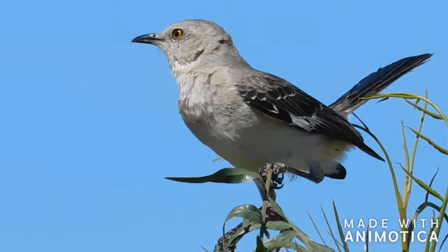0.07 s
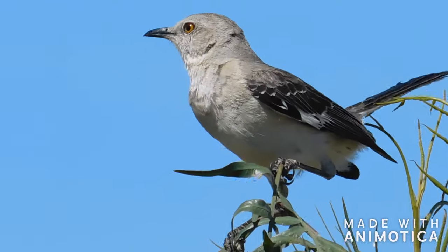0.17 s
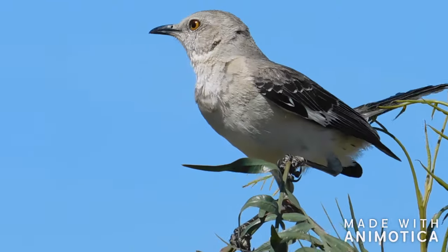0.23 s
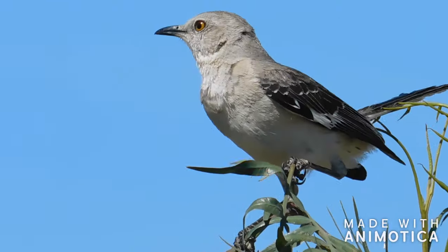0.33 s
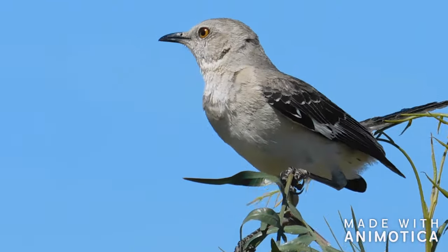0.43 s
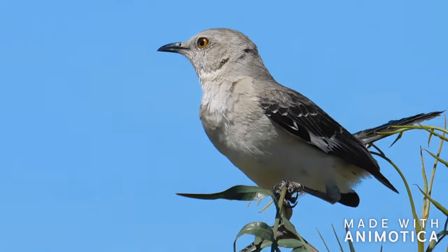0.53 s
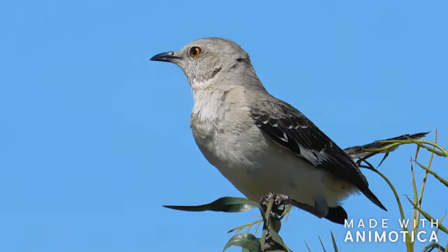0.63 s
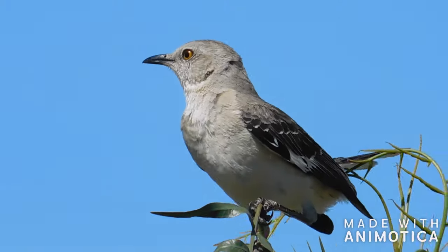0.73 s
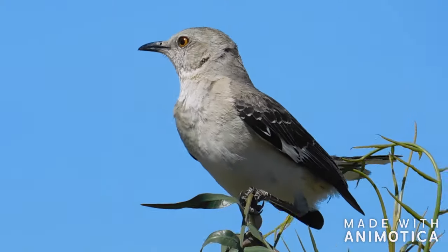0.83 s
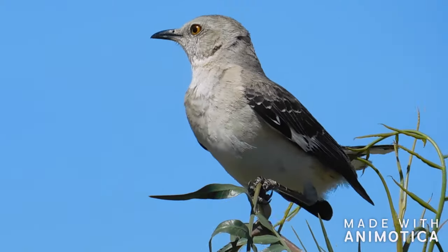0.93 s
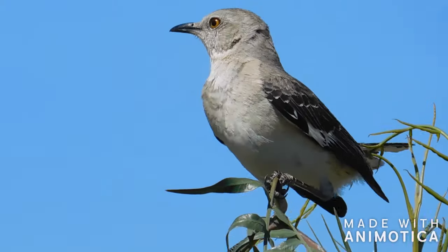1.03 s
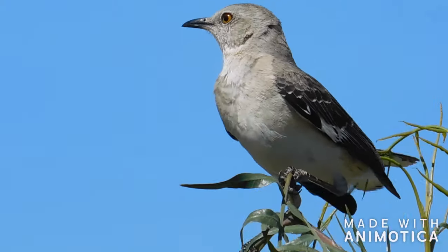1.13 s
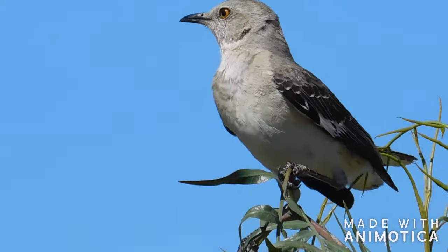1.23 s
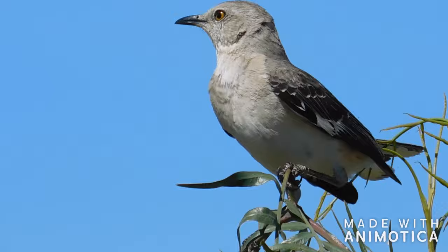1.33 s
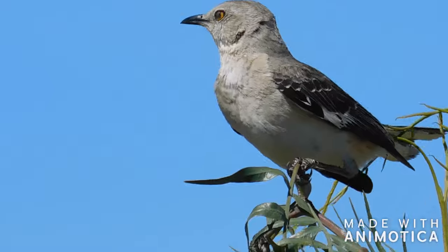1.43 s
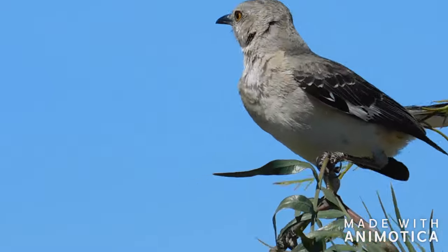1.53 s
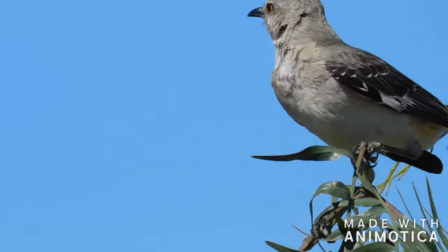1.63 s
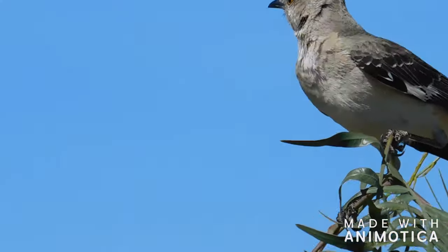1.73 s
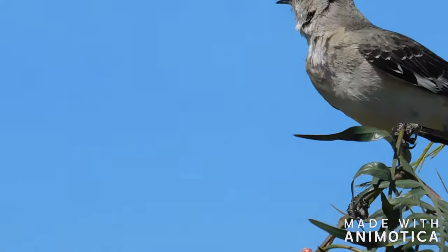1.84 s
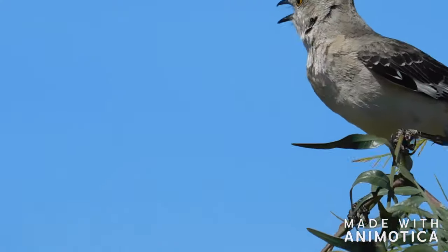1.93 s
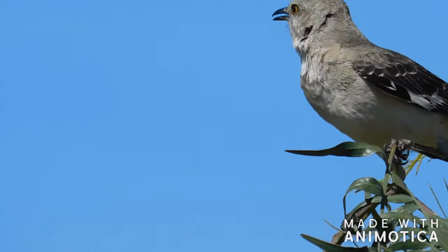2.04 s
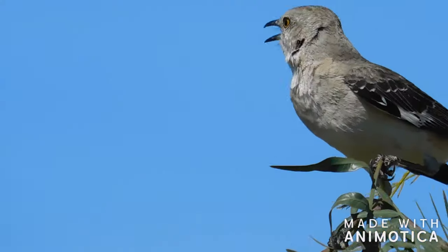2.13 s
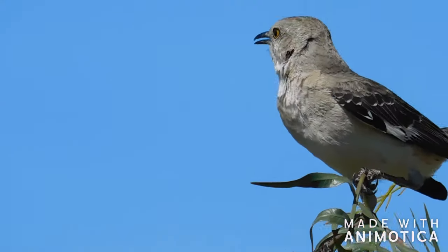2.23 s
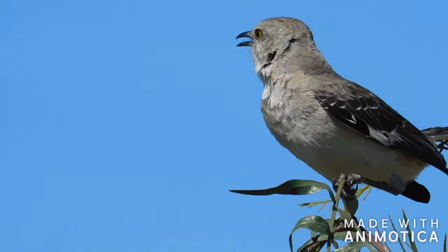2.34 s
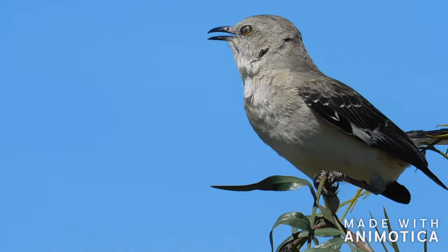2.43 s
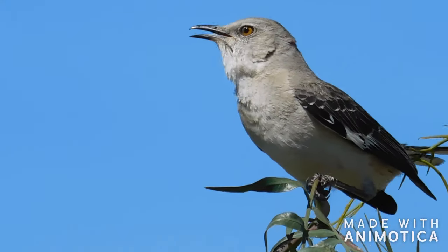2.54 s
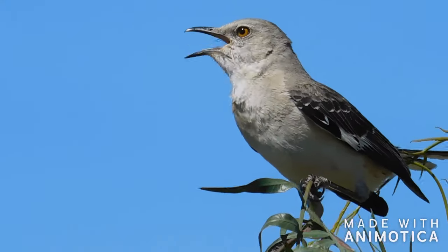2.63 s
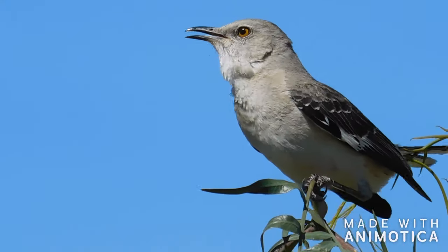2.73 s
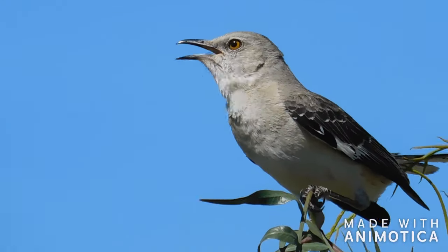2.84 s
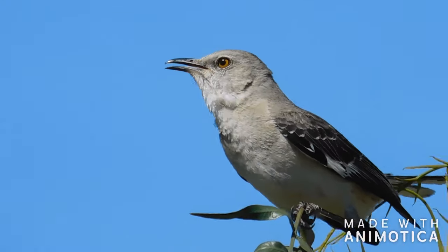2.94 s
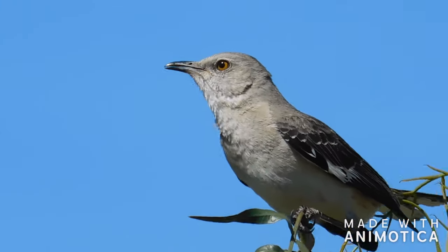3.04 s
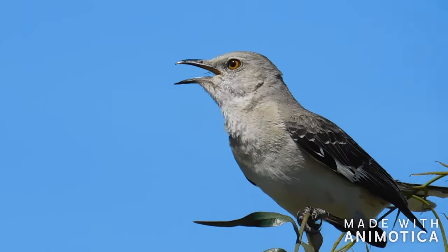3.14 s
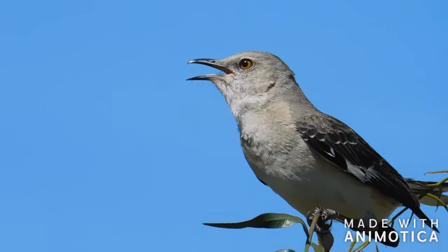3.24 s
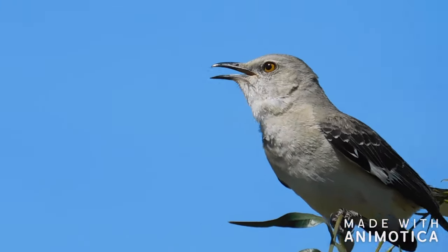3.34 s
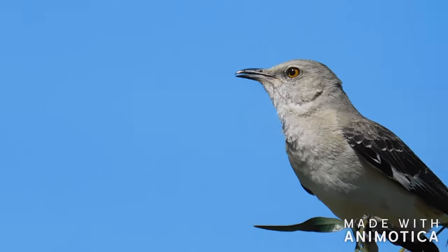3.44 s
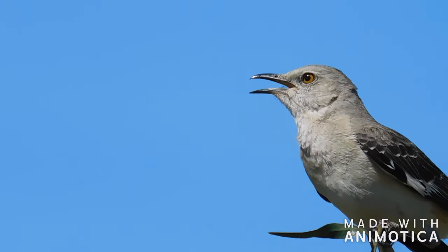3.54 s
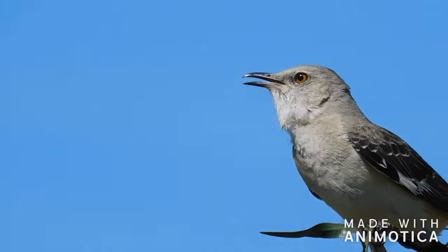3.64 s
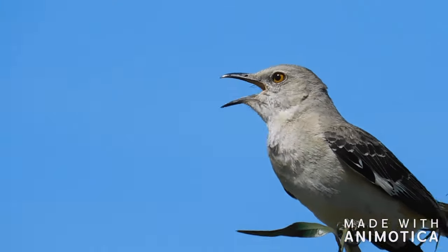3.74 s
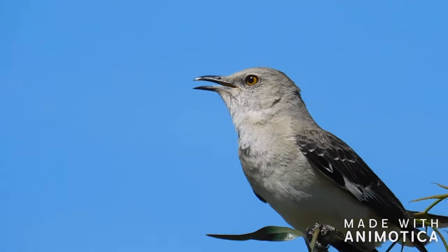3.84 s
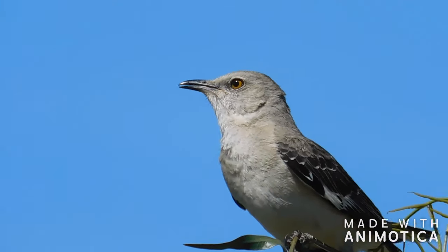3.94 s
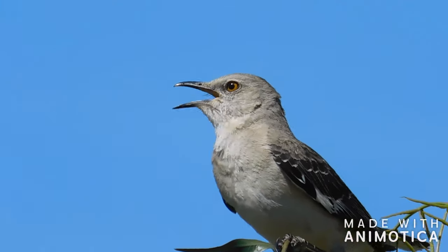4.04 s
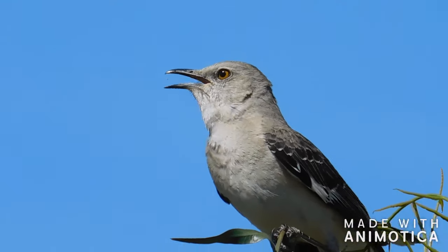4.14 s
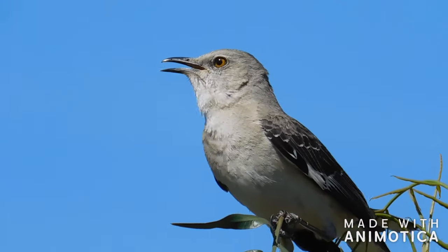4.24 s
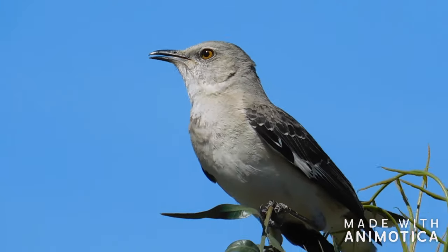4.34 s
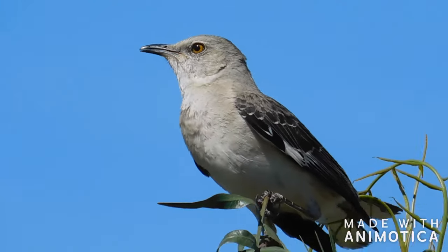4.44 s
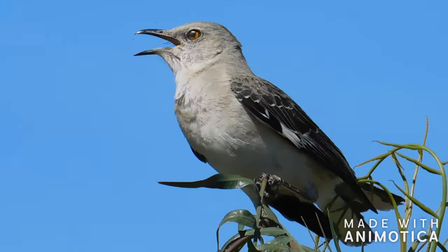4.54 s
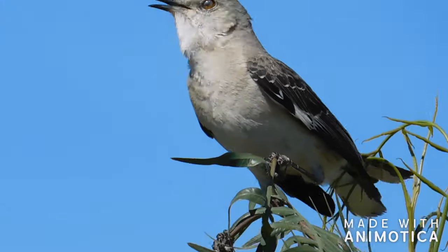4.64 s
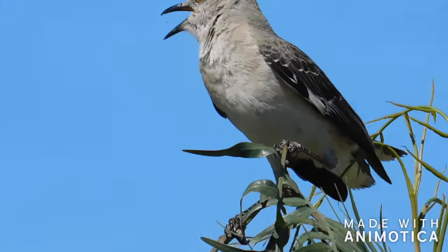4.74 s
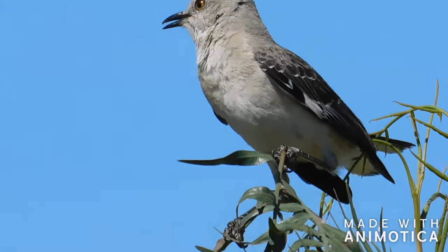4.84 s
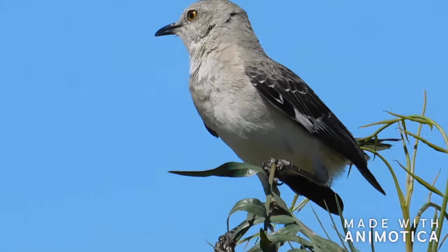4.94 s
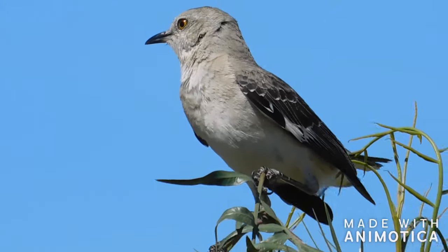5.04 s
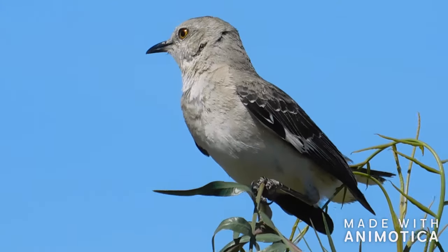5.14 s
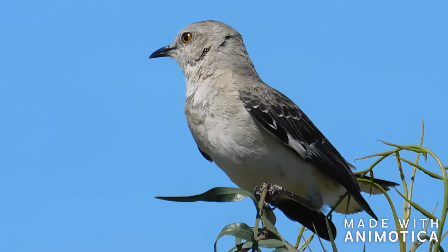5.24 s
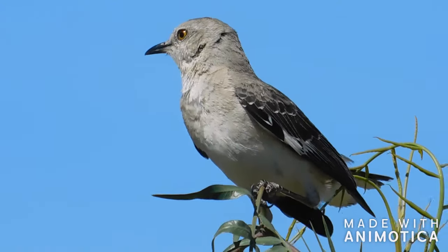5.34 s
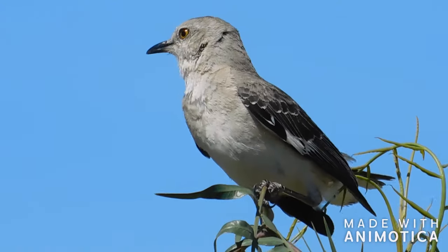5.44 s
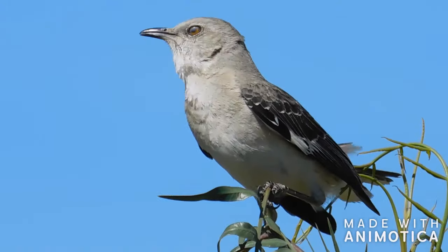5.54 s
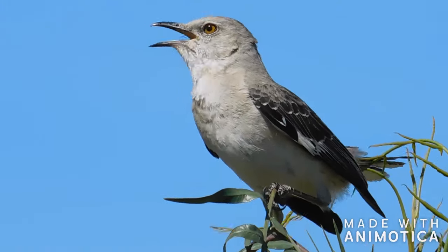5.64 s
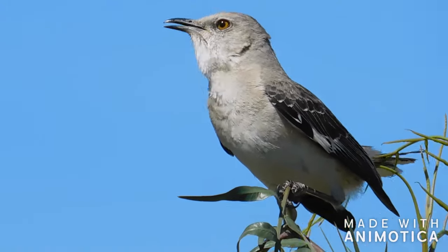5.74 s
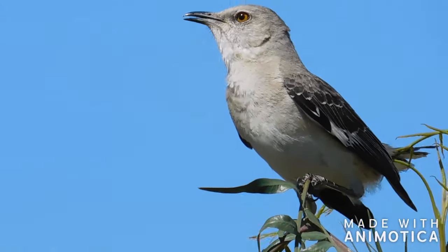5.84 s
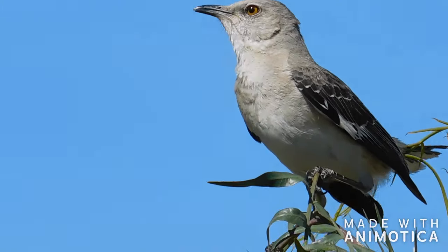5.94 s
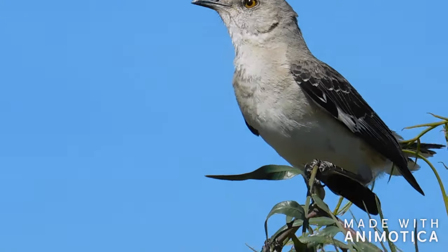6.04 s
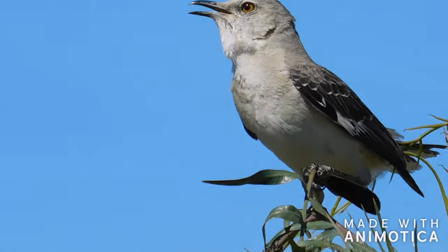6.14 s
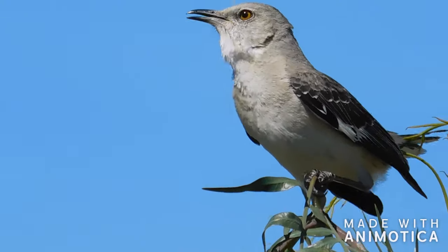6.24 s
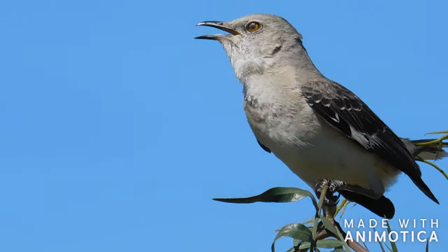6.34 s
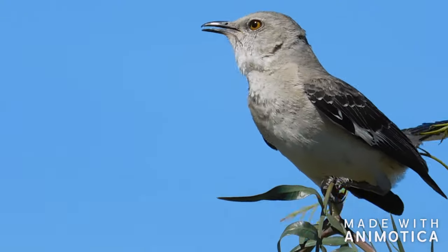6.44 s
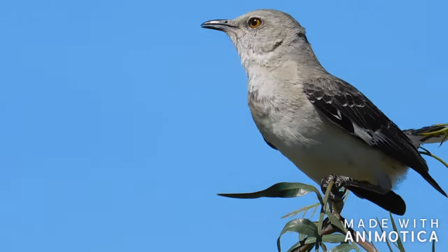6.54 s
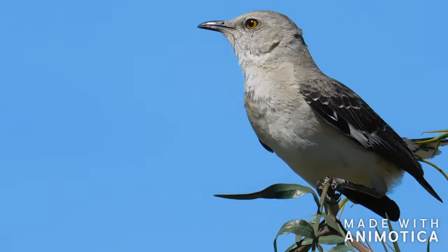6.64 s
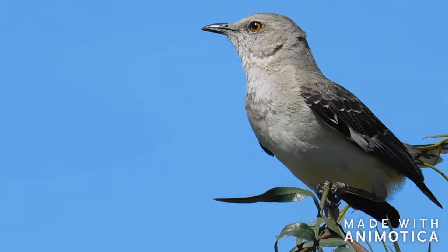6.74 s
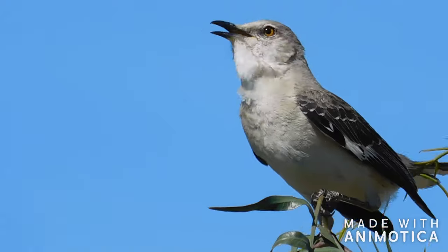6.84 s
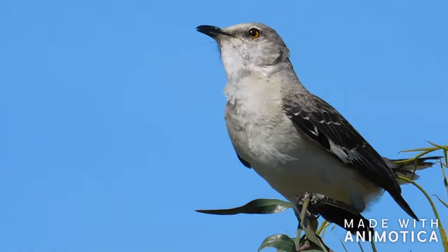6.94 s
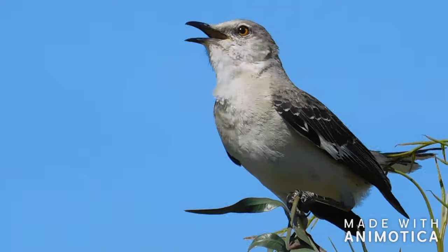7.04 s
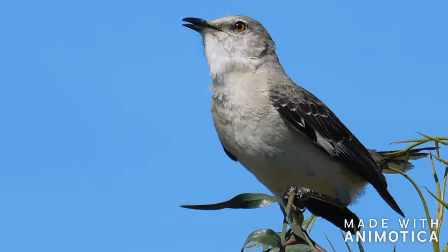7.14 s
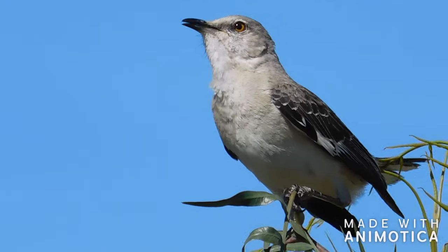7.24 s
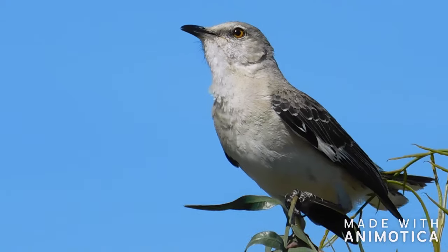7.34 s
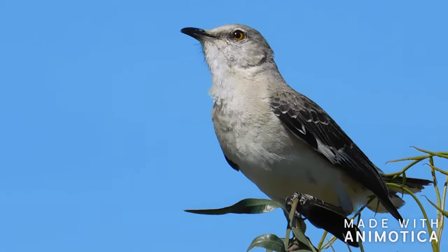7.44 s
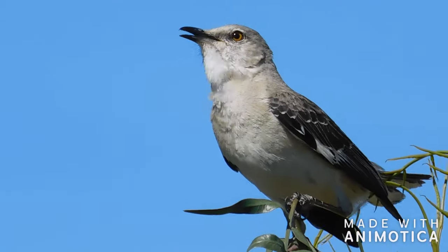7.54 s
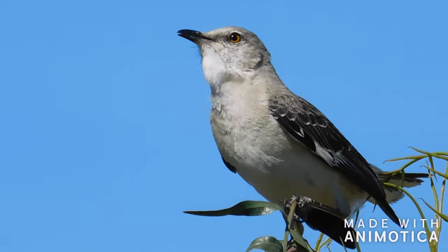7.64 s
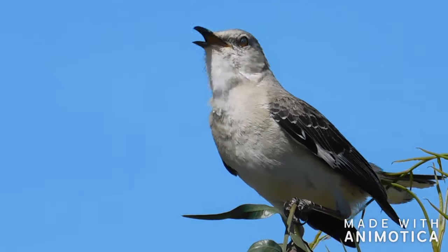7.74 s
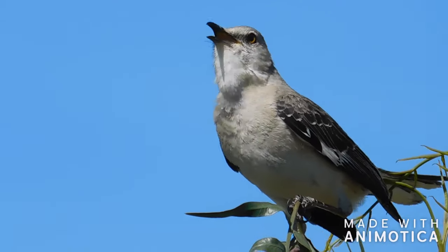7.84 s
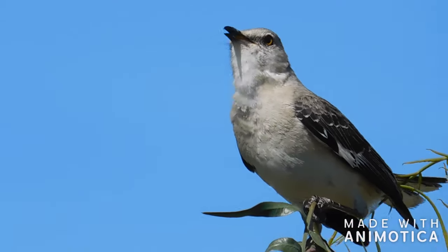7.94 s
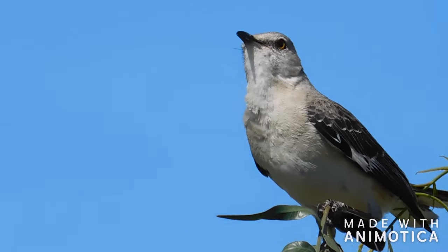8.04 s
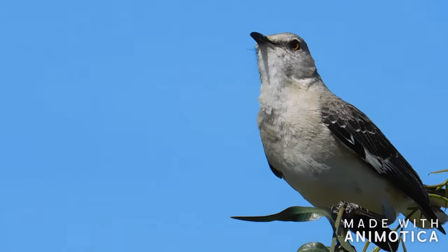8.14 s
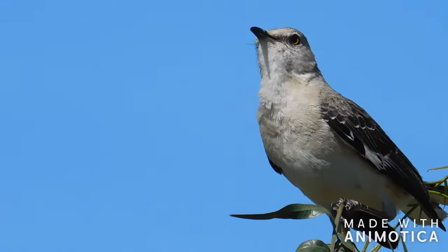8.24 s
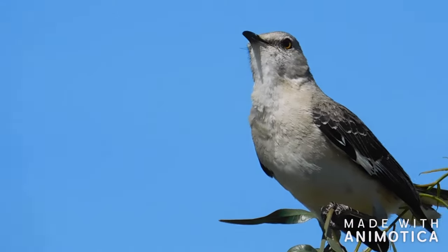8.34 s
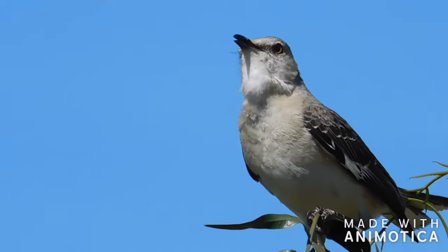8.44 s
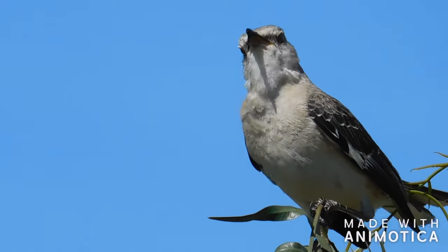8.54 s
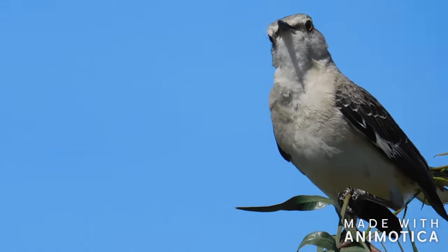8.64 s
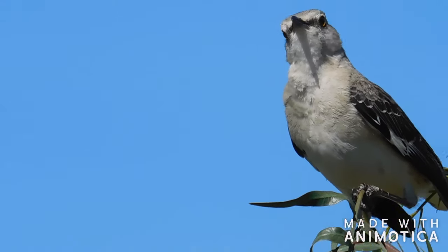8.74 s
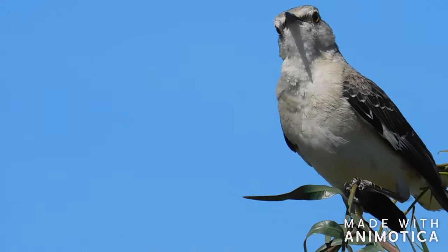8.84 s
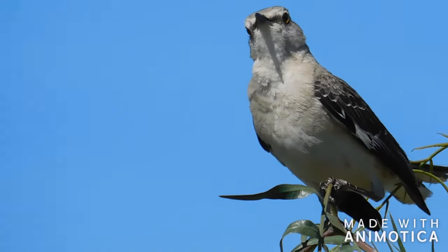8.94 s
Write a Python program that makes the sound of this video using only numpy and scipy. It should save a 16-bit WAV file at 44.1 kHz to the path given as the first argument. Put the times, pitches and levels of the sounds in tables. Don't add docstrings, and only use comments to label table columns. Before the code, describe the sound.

Outdoor birdsong: clear liquid whistles in repeated sets, hooks, sweeps and arches, with light treetop echo above low road hum and brief wind buffeting.

```python
import sys
import numpy as np
from scipy import signal
from scipy.fft import rfft, irfft
from scipy.io import wavfile
from scipy.ndimage import uniform_filter1d

SR = 44100
rng = np.random.default_rng(int(sys.argv[2]) if len(sys.argv) > 2 else 0)


def gain_from_db(level_db):
    decades = np.asarray(level_db, float) / 20
    return 10 ** decades


def transcribe(u):
    v = np.clip(np.atleast_2d(u).T, -1, 1)
    q = np.round(v * 32767).astype(np.int16)
    wavfile.write(sys.argv[1], SR, q)


N = 396018


def noise():
    return rng.standard_normal(N)


def level(x, db):
    return x * gain_from_db(db) / np.sqrt(np.mean(x ** 2))


def along(table, hz):
    at, value = np.transpose(table)
    return np.interp(np.log(hz + 1), np.log(at), value)


def walk(rate):
    hold = int(SR / rate)
    steps = np.repeat(rng.standard_normal(N // hold + 1), hold)
    return 1.195 * uniform_filter1d(uniform_filter1d(steps, hold), hold)[:N]


def band(x, lo_hz, hi_hz, order=2):
    return signal.sosfilt(signal.butter(order, [lo_hz, hi_hz], "band", fs=SR, output="sos"), x)


def tracks(notes, slew_s=0.00034):
    t, size = np.arange(N) / SR, int(slew_s * SR)
    s, hz, _ = np.concatenate(notes).T
    order = np.argsort(s)
    pitch = np.interp(t, s[order], hz[order])
    loud = sum(np.interp(t, n[:, 0], gain_from_db(n[:, 2]), 0, 0) for n in map(np.array, notes))
    return uniform_filter1d(pitch, size), uniform_filter1d(loud, size)


def stack(hz, harmonics_db):
    phase = 2 * np.pi * np.cumsum(hz) / SR
    return sum(np.sqrt(2) * gain_from_db(db) * np.sin(k * phase) for k, db in enumerate(harmonics_db, 1))


def road_hiss():
    # pitch_hz, level_db [dB per Hz]
    spectrum = [(25, -6), (60, -9), (101, -6.5), (160, -21.5), (300, -22), (970, -19), (1700, -24),
                (2560, -29.5), (4000, -40.5), (6000, -47), (15500, -52)]
    # pitch_hz, likeness [0..1]
    likeness = [(30, .75), (120, .4), (400, .66), (2000, .62), (6000, .35)]
    ripple_db, bounce_lag_s = 1.5, 0.00392
    hz, swell, out = np.fft.rfftfreq(N, 1 / SR), walk(0.73), 0
    like = np.clip(along(likeness, hz), 0, 1)
    mid = rfft(noise()) * np.sqrt(1 + like)
    side = rfft(noise()) * np.sqrt(1 - like)
    bounce = ripple_db * np.cos(2 * np.pi * hz * bounce_lag_s) * (abs(hz - 1650) < 450)
    both = gain_from_db(along(spectrum, hz) + bounce) * np.array([mid + side, mid - side])
    for centre in np.arange(4.5, 14.5, 0.5):
        share = np.clip(1 - 2 * abs(np.log2(hz + 1) - centre), 0, 1)
        unsteady = 1 + 4.0 / centre ** 3.74
        flicker_db = unsteady * (0.7 * swell + 0.28 * walk(1.7) + 0.13 * walk(8))
        out = out + irfft(both * share, N) * gain_from_db(flicker_db)
    return level(out, -52.5) * gain_from_db(np.array([[0.6], [-0.6]]))


def tyre_whine():
    pitch_hz, width_hz = 1780, 90
    whine = band(noise(), pitch_hz - width_hz / 2, pitch_hz + width_hz / 2)
    return level(whine * gain_from_db(2.5 * walk(12) + np.linspace(-1, 3, N)), -69)


def lorry():
    # start_s, cycle_rate_hz, level_db
    revs = [(0, 18.3, -65), (2.6, 19.8, -59), (4.2, 17, -66), (4.6, 21.4, -95), (5.3, 17.2, -60),
            (5.6, 22.2, -55), (6.4, 22.1, -57.5), (6.7, 18, -86), (7.2, 18.7, -73.5), (7.6, 22.3, -54.5),
            (8.98, 26.2, -59)]
    harmonics = [-21.5, -4, -9, -2, -2.5]
    hz, loud = tracks([revs], 0.1)
    return loud * gain_from_db(2.5 * walk(5) - 2) * stack(hz * (1 + 0.025 * walk(8)), harmonics)


def wind():
    # [90 to 250 Hz layer, relative to level_db]
    gusts = [
        [(1.447, 0.014, -34, -24), (1.495, 0.04, -38, -10), (2.228, 0.017, -37, -23), (1.577, 0.021, -40, -18),
         (1.852, 0.018, -29, -14), (1.955, 0.018, -40.5, -32), (2.114, 0.029, -34, -28),
         (2.181, 0.036, -32, -16), (2.37, 0.04, -36.5, -18), (2.573, 0.079, -42.5, -18),
         (4.942, 0.058, -37, -21)],
        [(1.385, 0.07, -47.5, -23), (1.55, 0.12, -52, -20), (2.14, 0.18, -52, -8), (4.929, 0.18, -41.5, -24),
         (8.333, 0.1, -44.5, -27.5), (8.631, 0.057, -41, -26), (8.874, 0.083, -44.5, -17)],
    ]
    # start_s, level_db
    breeze = [
        (0, -54),
        (1.1, -51),
        (2.3, -46),
        (3, -51),
        (3.9, -50.5),
        (4.4, -57),
        (5.3, -64),
        (7.0, -77.5),
        (8.3, -50.5),
        (8.98, -50),
    ]
    t, out, shared = np.arange(N) / SR, [], noise()
    breeze_db = np.interp(t, *np.transpose(breeze))
    for buffets, port_db in zip(gusts, (1.5, -1.5)):
        low = band(noise() + 0.7 * shared, 25, 130)
        edge = band(noise(), 90, 250) * gain_from_db(5.0 * walk(50))
        rumble = level(band(noise() + 3.8 * shared, 22.5, 63), port_db)
        port = rumble * gain_from_db(breeze_db + 2.0 * walk(7.8))
        for s, length, db, edge_db in buffets:
            near = slice(int((s - 2 * length) * SR), int((s + 2 * length) * SR))
            puff = np.exp(-(2.12 * (t[near] - s) / length) ** 2)
            port[near] += level(low[near], db) * puff
            port[near] += level(edge[near], db + edge_db - 3.5) * puff
        out.append(port)
    return np.array(out)


def camera():
    whine_hz, start_s, every_s, whir_s = 15455, 0.37, 0.52, 0.04
    t = np.arange(N) / SR - start_s
    whir = np.exp(-((t - every_s * np.round(t / every_s)) / whir_s) ** 4)
    motor = band(noise(), 10800, 11300) + 0.6 * band(noise(), 12000, 12600)
    whine = level(band(noise(), whine_hz - 60, whine_hz + 60), -93)
    return whine + level(motor, -88) * whir


def far_birds():
    # start_s, length_s, start_hz, end_hz, level_db
    calls = [(0.225, 0.062, 2700, 2290, -67), (0.497, 0.075, 2660, 2210, -67),
             (0.759, 0.044, 2660, 2450, -66), (0.702, 0.14, 4520, 4350, -84),
             (0.994, 0.075, 2780, 2430, -71), (0.758, 0.13, 912, 1072, -64),
             (0.923, 0.038, 2230, 2130, -65), (.995, 0.032, 2060, 2260, -67),
             (1.098, 0.036, 2870, 3240, -68.5), (5.131, 0.043, 3600, 2600, -70),
             (5.26, 0.046, 2900, 2770, -71.5), (5.275, 0.033, 2137, 2170, -65.5),
             (5.404, 0.032, 3010, 3110, -68), (5.449, 0.026, 3100, 3020, -71),
             (5.489, 0.02, 3090, 2830, -69.5), (5.517, 0.019, 3050, 2740, -65),
             (6.127, 0.015, 2504, 2820, -69), (6.153, 0.03, 2420, 1850, -65), (6.2, 0.022, 2070, 2150, -67),
             (6.997, 0.36, 1413, 1381, -70), (8.43, 0.036, 2520, 2830, -72), (8.487, .036, 4100, 4700, -79),
             (8.518, 0.042, 4600, 3797, -78), (8.886, .036, 4330, 4010, -82),
             (8.912, 0.055, 2580, 2900, -67), (8.928, 0.032, 4500, 4000, -78)]
    out, sides = np.zeros((2, N)), rng.uniform(-1.55, 1, (len(calls), 1))
    for (s, length, a_hz, b_hz, db), (side,) in zip(calls, sides):
        u, i = np.linspace(0, 1, int(length * SR)), int(s * SR)
        arch = np.sin(np.pi * u)
        bend = (length < 0.035) * 0.0027 / length
        hz = (a_hz + (b_hz - a_hz) * u) * (1 + bend * arch)
        note = np.sqrt(arch) * np.sin(2 * np.pi * np.cumsum(hz) / SR)
        out[:, i:i + len(u)] += level(note, db) * gain_from_db(4 * side * np.array([[1], [-1]]))
    return out * gain_from_db(2.2 * walk(150))


def trees(x):
    # delay_s, width_s, level_db
    crowns = [
        (.052, 0.01, 5.5),
        (.11, 0.012, 4.5),
        (.2, .04, -3),
    ]
    rise_s, t60_s, top_hz = 0.0076, 0.78, 4400
    near_t60_s, near_db = 0.14, 10
    t = np.arange(SR) / SR
    shape = (1 - np.exp(-(t / rise_s) ** 2)) * gain_from_db(3.5 * walk(45)[:SR])
    shape *= gain_from_db(-60 * t / t60_s) + gain_from_db(near_db - 60 * t / near_t60_s)
    shape *= gain_from_db(sum(db * np.exp(-((t - s) / width) ** 2) for s, width, db in crowns))
    common, *own = rng.standard_normal((3, SR))
    tails = np.array([band(shape * (0.1 * common + o), 330, top_hz) for o in own])
    tails *= gain_from_db(-16) / np.sqrt(np.sum(tails ** 2) / 2 / (2 * top_hz / SR))
    return signal.fftconvolve(x[None], tails, axes=1)[:, :N]


def overtones(hz, loud, first=2, count=6):
    # pitch_hz, level_db
    throat = [(3500, -74), (5200, -68.5), (6200, -71), (7500, -69.5), (9500, -67), (11000, -68),
              (13500, -65), (15000, -66.5)]
    # start_s, level_db, octave_extra_db
    beak = [(2, -7, 7), (3.1, 1.5, 0), (3.3, 0, 8.5), (4.299, 2.5, 11.5), (4.42, 3.5, 3), (4.7, 0.5, 15),
            (5, -2, 1), (5.6, -2.5, 3), (7.05, 1, 3), (7.3, -4, 1.5), (7.76, 0, 7), (7.93, 1, 4.5),
            (8, -7, 6.5), (8.6, -1, 4), (8.67, -4, -9), (8.7, 7.5, -1)]
    s, open_db, octave_db = np.transpose(beak)
    t, lines = np.arange(N) / SR, 0
    push = abs(uniform_filter1d(loud, int(0.022 * SR)) / gain_from_db(-23))
    effort = push ** 0.64 * gain_from_db(np.interp(t, s, open_db))
    phase = 2 * np.pi * np.cumsum(hz * (1 + 0.004 * walk(340))) / SR
    rich_db = np.clip(16 * np.log2(2900 / hz), 0, 5)
    for k in range(first, first + count):
        line_db = along(throat, k * hz) + rich_db + 2.1 * (k == 3) - 0.96 * (k - first)
        line_db = line_db + (k == 2) * np.interp(t, s, octave_db)
        line_db = line_db + 3.6 * walk(45) + 2.6 * walk(220)
        harder = push ** (0.07 * (k - first))
        lines = lines + gain_from_db(line_db) * harder * np.sin(k * phase) * (k * hz < 0.4 * SR)
    colour = gain_from_db(along([(4800, -92.5)] + throat[2:], np.fft.rfftfreq(N, 1 / SR)) + 2.5)
    breath = irfft(rfft(noise()) * colour, N) * gain_from_db(2.5 * walk(90))
    return effort * (gain_from_db(2.5) * push ** 0.3 * lines + breath)


def sing(shape, rows):
    s, hz, db = np.transpose(shape)
    far = abs(s / abs(s).max())
    return [np.c_[turn + s * stretch ** far, hz * pitch, db + row_db]
            for turn, stretch, pitch, row_db in rows]


def join(firsts, seconds):
    notes = [np.concatenate([a, b]) for a, b in zip(firsts, seconds)]
    return [note[np.argsort(note[:, 0])] for note in notes]


def song():
    # from_turn_s, pitch_hz, level_db
    hook = [
        (-.019, 2800, -64),
        (-.014, 2480, -33.5),
        (-.009, 2280, -33.5),
        (-.005, 2080, -31),
    ]
    slip = [
        (0, 2720, -36.5),
        (.004, 2420, -27.5),
        (.012, 2220, -27.5),
        (.022, 2050, -38),
        (.03, 1918, -61),
    ]
    # turn_s, far_end_stretch [ratio], pitch_factor [ratio], level_db
    hooks = [
        (2.039, 0.66, 0.99, -10.5),
        (2.26, 0.91, 1, -0.5),
        (2.485, .95, 1, -3.5),
        (2.713, .95, 1.01, -0.5),
        (2.946, 1.04, 0.98, 1.5),
    ]
    slips = [
        (2.041, 1.12, 0.99, -8.5),
        (2.26, 0.84, 1.017, -2.5),
        (2.485, 1.08, 1, -4.5),
        (2.711, 1.1, 1.01, -2.5),
        (2.945, 0.72, 0.99, -0.5),
    ]
    # start_s, pitch_hz, level_db
    rises = [
        [(2.101, 2710, -55), (2.111, 2790, -34.5), (2.127, 3080, -26.5), (2.131, 3300, -48), (2.134, 3600, -50),
         (2.137, 3900, -49)],
        [(2.311, 2760, -56.5), (2.313, 2760, -41.5), (2.344, 3010, -25), (2.35, 3180, -27.0),
         (2.355, 3450, -49.5), (2.357, 3800, -46.5)],
        [(2.535, 2790, -54), (2.546, 2740, -37.5), (2.557, 2810, -30), (2.575, 3070, -23.5), (2.581, 3400, -38),
         (2.583, 3700, -44)],
        [(2.763, 2770, -54), (2.773, 2710, -34), (2.799, 2980, -23.5), (2.806, 3190, -25), (2.81, 3500, -39),
         (2.813, 3950, -46)],
        [(3.013, 2530, -51), (3.033, 2810, -28.5), (3.042, 3080, -23.5), (3.046, 3230, -23.5),
         (3.051, 3490, -53), (3.053, 3930, -45)],
    ]
    falls = [
        [(2.139, 3860, -55.5), (2.142, 3640, -49.5), (2.15, 3275, -28.5), (2.156, 3110, -24.5),
         (2.166, 2804, -30), (2.179, 2742, -46), (2.181, 2730, -57)],
        [(2.359, 3900, -47), (2.36, 3730, -44.5), (2.369, 3240, -28.5), (2.373, 3140, -24.5),
         (2.383, 2800, -28.5), (2.401, 2710, -60.5)],
        [(2.585, 3720, -49), (2.589, 3290, -26), (2.6, 2940, -23.5), (2.61, 2684, -29.5), (2.628, 2670, -42.5),
         (2.636, 2380, -41.5), (2.637, 2410, -59)],
        [(2.815, 4000, -55), (2.817, 3720, -49.5), (2.822, 3310, -24.5), (2.833, 2890, -24), (2.843, 2775, -29),
         (2.88, 2840, -47), (2.881, 2820, -60)],
        [(3.055, 3910, -40), (3.06, 3344, -29.5), (3.07, 3120, -21), (3.077, 2833, -24.0), (3.1, 2686, -42.5),
         (3.108, 2330, -43.5), (3.109, 2440, -58)],
    ]
    # start_s, pitch_hz, level_db
    droops = [
        [(3.329, 2131, -53), (3.333, 2273, -39), (3.34, 2527, -38.5), (3.355, 2484, -26), (3.388, 1980, -34),
         (3.401, 1873, -39.0), (3.41, 1981, -45)],
        [(3.764, 2025, -56), (3.777, 2422, -38.5), (3.788, 2430, -32), (3.817, 2064, -33.0),
         (3.843, 1877, -39.5), (3.858, 2034, -43.5)],
        [(4.223, 2192, -50), (4.241, 2656, -38.5), (4.261, 2480, -30.5), (4.278, 2174, -30.5),
         (4.3, 1959, -35.5), (4.312, 1890, -50.5), (4.317, 2068, -52)],
        [(4.751, 2110, -54), (4.762, 2405, -38.5), (4.779, 2327, -29.5), (4.785, 2215, -28.5),
         (4.83, 1870, -37.5), (4.843, 1966, -57)],
    ]
    climbs = [
        [(3.411, 2053, -49), (3.419, 2784, -40.5), (3.427, 3016, -31.5), (3.438, 3228, -27),
         (3.447, 3416, -31.5), (3.463, 4225, -40.5), (3.468, 4332, -62)],
        [(3.86, 1991, -44.5), (3.872, 2752, -41), (3.884, 3220, -33.5), (3.904, 3570, -30),
         (3.914, 3840, -26.5), (3.921, 4052, -32.5), (3.924, 4353, -51.5)],
        [(4.321, 2169, -60), (4.326, 2320, -42), (4.336, 3090, -27.5), (4.373, 4080, -28), (4.376, 4385, -47),
         (4.38, 4797, -47)],
        [(4.848, 1972, -49.5), (4.867, 2734, -42.0), (4.88, 3156, -30.5), (4.896, 3430, -32),
         (4.904, 3850, -31.5), (4.909, 4112, -45.5), (4.917, 5340, -50.5)],
    ]
    drops = [
        [(3.47, 4187, -44), (3.475, 3724, -24.5), (3.477, 3500, -30.5), (3.485, 3150, -22), (3.493, 2890, -24),
         (3.526, 2790, -35), (3.53, 2665, -38.5), (3.539, 2700, -57)],
        [(3.926, 4304, -56.5), (3.927, 4093, -32.5), (3.931, 3696, -26.5), (3.941, 3240, -22),
         (3.951, 3003, -24.5), (3.99, 3010, -36), (3.996, 2838, -40.5), (4.002, 2800, -59)],
        [(4.382, 4715, -50), (4.383, 4434, -39.5), (4.384, 3952, -26.5), (4.387, 3864, -28.5),
         (4.394, 3200, -21), (4.408, 2850, -26.5), (4.441, 2950, -34), (4.457, 2860, -63)],
        [(4.919, 5300, -49), (4.924, 4407, -50.5), (4.93, 3524, -27), (4.938, 3012, -24), (4.947, 2870, -27),
         (4.985, 2783, -32), (5.004, 2800, -67)],
    ]
    # start_s, pitch_hz, level_db
    scoops = [
        [(5.661, 2868, -53), (5.663, 3008, -42), (5.667, 2520, -36), (5.672, 2410, -30.5), (5.677, 2486, -26.5),
         (5.679, 2760, -35), (5.683, 2853, -31.5), (5.699, 2303, -32.5), (5.71, 2140, -54)],
        [(6.318, 2780, -50), (6.329, 2354, -26.5), (6.335, 2413, -25), (6.338, 2830, -43), (6.341, 2698, -27),
         (6.35, 2374, -27), (6.361, 2058, -37), (6.369, 2088, -36.5), (6.373, 2150, -67)],
        [(7.008, 3173, -60.5), (7.013, 2850, -37.5), (7.021, 2177, -27.5), (7.029, 2290, -27),
         (7.032, 2940, -30.5), (7.035, 2547, -28), (7.041, 2427, -26), (7.052, 2099, -35), (7.062, 2024, -60)],
        [(7.735, 3060, -58.5), (7.74, 3096, -32.5), (7.745, 2644, -31.5), (7.75, 2517, -28), (7.757, 2895, -28),
         (7.76, 2726, -28.5), (7.77, 2270, -26), (7.777, 1993, -36), (7.79, 1982, -46)],
    ]
    swells = [
        [(5.768, 2430, -59), (5.779, 2635, -36), (5.793, 3002, -24.5), (5.802, 3107, -25), (5.823, 3192, -33.5),
         ],
        [(6.424, 2290, -53), (6.426, 2283, -43.5), (6.444, 2710, -35.5), (6.467, 2977, -23.5),
         (6.485, 3215, -34.5)],
        [(7.171, 2040, -61), (7.174, 2016, -42), (7.199, 2840, -27.5), (7.212, 3030, -27), (7.224, 3224, -30.5)],
    ]
    sags = [
        [(5.829, 3238, -32), (5.848, 3100, -25.0), (5.869, 2680, -30), (5.892, 2590, -44.5),
         (5.902, 2574, -43.5), (5.965, 2625, -47.5), (5.968, 2615, -59.5)],
        [(6.487, 3170, -30), (6.508, 3060, -26), (6.519, 2870, -27), (6.545, 2650, -36), (6.568, 2630, -43),
         (6.604, 2595, -52), (6.605, 2592, -55)],
        [(7.226, 3219, -32.5), (7.251, 2980, -25), (7.27, 2700, -29.5), (7.282, 2680, -35), (7.298, 2680, -41),
         (7.367, 2470, -46), (7.368, 2460, -57.5)],
    ]
    # start_s, pitch_hz, level_db
    flat = [
        (7.93, 2330, -57),
        (7.955, 2430, -30),
        (7.973, 2313, -28),
        (7.99, 2303, -23.5),
        (8.014, 2258, -21.5),
        (8.05, 2248, -25.5),
        (8.067, 2274, -26),
        (8.074, 2407, -53),
    ]
    cap = [
        (8.573, 2063, -69.0),
        (8.577, 2187, -29),
        (8.586, 2194, -25.5),
        (8.592, 1925, -38.5),
        (8.597, 1730, -44.5),
    ]
    flourish = [
        (8.653, 2100, -67.0),
        (8.663, 2267, -33.5),
        (8.683, 2476, -23),
        (8.693, 2025, -34),
        (8.699, 2856, -24.5),
        (8.705, 3276, -31),
        (8.719, 2954, -18),
        (8.723, 2210, -33.5),
        (8.729, 1810, -58),
    ]
    hooks_and_peaks = join(sing(hook, hooks), sing(slip, slips)) + join(rises, falls)
    droops_and_sweeps = droops + join(climbs, drops)
    scoops_and_arches = scoops + join(swells, sags)
    return hooks_and_peaks + droops_and_sweeps + scoops_and_arches + [flat, cap, flourish]


def whistles():
    hz, loud = tracks(song())
    tremor = gain_from_db(0.5 * walk(300) + 0.3 * walk(110))
    return loud * tremor * stack(hz * (1 + 0.004 * walk(300)), [0]) + overtones(hz, loud)


def chips():
    # start_s, second_harmonic_hz, level_db
    outlines = [
        [(3.288, 2400, -55), (3.294, 2775, -42), (3.298, 3180, -33), (3.302, 3480, -35), (3.308, 2910, -34.5),
         (3.316, 2306, -54)],
        [(3.72, 2455, -51), (3.728, 3090, -36), (3.734, 3496, -39.5), (3.739, 3170, -32), (3.743, 2600, -45),
         (3.748, 2334, -52)],
        [(4.184, 2536, -62), (4.189, 2960, -41), (4.194, 3740, -35.5), (4.199, 3840, -34), (4.207, 2930, -38),
         (4.212, 2500, -65)],
        [(4.706, 2790, -60), (4.71, 2960, -44.5), (4.716, 3355, -36), (4.724, 3680, -32.5),
         (4.731, 2940, -34.5), (4.737, 2490, -59)],
    ]
    harmonics = [-11.5, 0, -23, -27]
    hz, loud = tracks(outlines, 0.0013)
    tone = loud * gain_from_db(1.7 * walk(500)) * stack(hz / 2, harmonics)
    return tone + gain_from_db(-0.5) * overtones(hz / 2, loud, first=5)


def syrinx_buzz():
    # start_s, pitch_hz, level_db
    outlines = [
        [(7.856, 2050, -51.5), (7.87, 2185, -47.5), (7.882, 2330, -38), (7.896, 2267, -38.5),
         (7.901, 2107, -50)],
        [(7.884, 3665, -65), (7.887, 3500, -56), (7.894, 3050, -43), (7.899, 2745, -55.5)],
        [(7.902, 2960, -49), (7.906, 2943, -32.5), (7.935, 2850, -31), (7.955, 2987, -31.5), (7.966, 2860, -67)],
    ]
    throb_hz, depth, bend = 168, 0.52, 0.05
    hurry = np.interp(np.arange(N) / SR, [7.935, 7.96], [0, 0.4])
    throb = 2 * np.pi * np.cumsum(throb_hz * (1 + 0.06 * walk(60) + hurry)) / SR
    spray = level(band(noise(), 3300, 6800), -33) * (1 + np.cos(throb))
    buzz = 0
    for note in outlines:
        hz, loud = tracks([note], 0.0013)
        hz = hz * (1 + bend * np.cos(throb))
        loud = loud * (1 + depth * np.sin(throb)) * gain_from_db(2.0 * walk(300))
        buzz = buzz + loud * stack(hz, [0]) + overtones(hz, loud, first=3, count=2) + loud * spray
    return buzz


def mockingbird():
    whistle, buzz = whistles(), syrinx_buzz()
    sum_tone = gain_from_db(3) * band(whistle * buzz, 4900, 6000)
    return whistle + chips() + buzz + sum_tone


def ports(x):
    # pitch_hz, left_minus_right_db
    shading = [(1600, 2.5), (1950, 5), (2300, 1), (2900, -5.5), (3300, 1), (4000, -0.5), (5500, 0.5),
               (8000, -2)]
    left_lag_s, scatter_rad = 2.2e-5, 0.6
    hz = np.fft.rfftfreq(N, 1 / SR)
    half = gain_from_db(along(shading, hz) / 2) * np.exp(-1j * np.pi * np.minimum(hz, 8500) * left_lag_s)
    half *= np.exp(1j * scatter_rad * walk(25)[:len(hz)] * np.clip(hz / 1500 - 3, 0, 1))
    return irfft(rfft(x) * np.array([half, 1 / half]), N)


def car():
    # start_s, firing_rate_hz, level_db
    gears = [
        [(2.5, 125.7, -51.5), (3.2, 134, -60), (4.3, 155.4, -67)],
        [(4.4, 112.8, -70.5), (6.0, 137.5, -59.5), (7.9, 159.3, -58), (8.2, 162.7, -59)],
    ]
    hz, loud = tracks(gears, 0.09)
    return loud * gain_from_db(1.8 * walk(6) - 4) * stack(hz * (1 + 0.008 * walk(8)), [0])


def scene():
    bird, far = mockingbird(), far_birds()
    echo = trees(bird + gain_from_db(7.5) * far[0])
    traffic = road_hiss() + tyre_whine() + lorry() + car()
    return ports(bird) + echo + gain_from_db(-0.5) * far + traffic + wind() + camera()


def masked(x):
    hz, _, z = signal.stft(x, SR, "cosine", 2048)
    hz = hz[:, None]
    power = (abs(z) ** 2).sum(axis=0)
    strong = power > gain_from_db(-36) * power.max(axis=0)
    octaves = np.log2((hz + 1) / ((strong * hz).max(axis=0) + 1))
    limit = power.sum(axis=0) * gain_from_db(2 * (-46 - 43 * octaves))
    keep = (uniform_filter1d(power, size=12, axis=0) > limit) | (octaves < 0) | (hz < 2500)
    return signal.istft(z * keep, SR, "cosine", 2048)[1][:, :N]


def band_limit(x):
    return signal.sosfilt(signal.butter(12, 15780, fs=SR, output="sos"), x)


def record(dry):
    low_pass = signal.ellip(8, 0.2, 60, 15800, fs=SR, output="sos")
    mix = masked(signal.sosfilt(low_pass, dry))
    return band_limit(mix)


dry = scene()
out = record(dry)
transcribe(out)
```